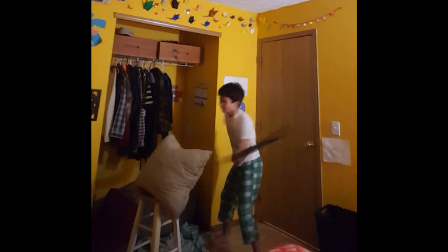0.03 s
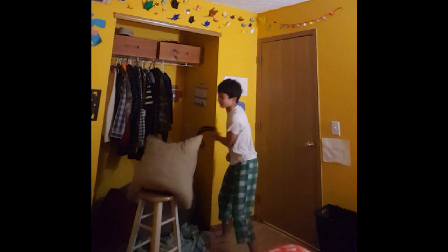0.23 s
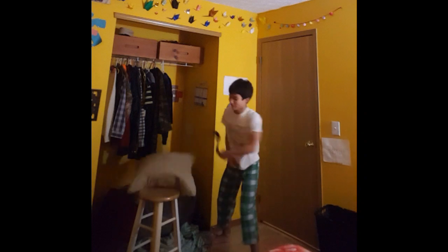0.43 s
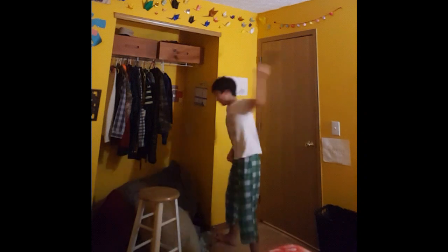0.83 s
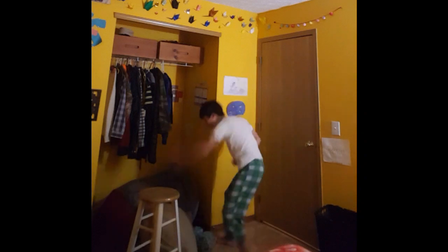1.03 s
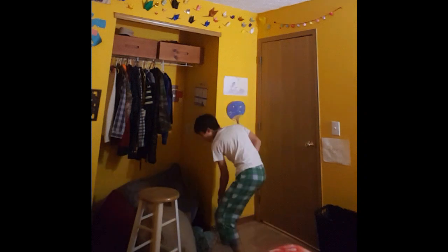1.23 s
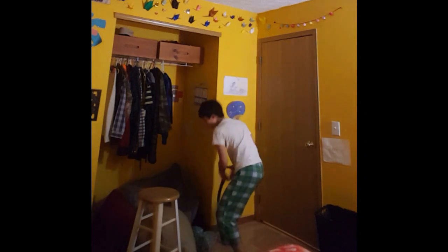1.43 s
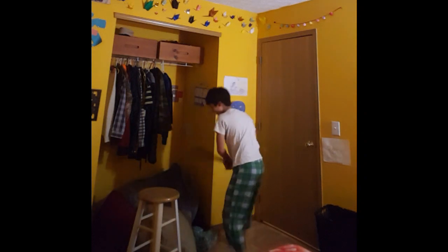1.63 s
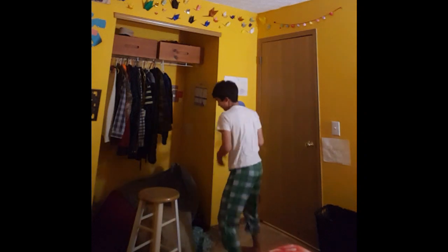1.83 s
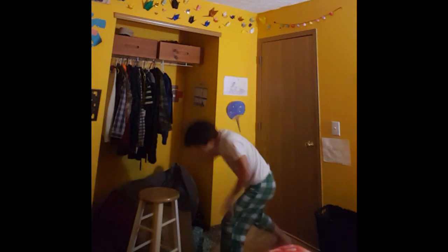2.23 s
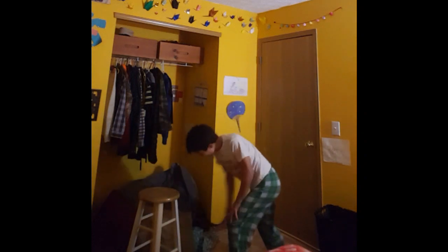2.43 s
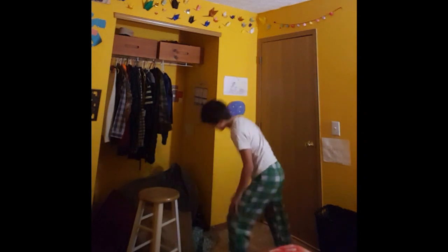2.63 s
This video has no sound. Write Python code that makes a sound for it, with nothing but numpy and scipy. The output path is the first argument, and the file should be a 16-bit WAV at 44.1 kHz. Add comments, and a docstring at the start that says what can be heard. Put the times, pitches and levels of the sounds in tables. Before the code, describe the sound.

A pillow is struck three times with heavy, slapping thumps, about a second apart. Between the blows, clothes rustle and feet thud on floorboards, and a board creaks faintly at the end. Heard close by in a small bedroom.

```python
"""A small bedroom, heard close by on a stereo pair of microphones, the action a little to the left.
A heavy blow, a slap of cloth and a push of air that fills the room and shakes the floor, knocks a
pillow off a stool at 0.2 s. The pillow slides down behind it and is hit on the floor at 1.2 s.
Feet thud on the boards and clothes rustle; the last blow lands at 2.4 s and a board creaks.
A faint mains hum lies under it all."""
import sys
import numpy as np
from scipy.fft import rfft, irfft
from scipy.io import wavfile
from scipy.ndimage import map_coordinates

SR = 44100
rng = np.random.default_rng(int(sys.argv[2]) if len(sys.argv) > 2 else 0)


def log_audio(samples):
    """Write samples as a 16-bit WAV file to the path given in sys.argv[1]."""
    # one column per channel
    frames = np.atleast_2d(samples).T
    # limit to full scale, then quantise
    limited = np.clip(frames, -1, 1)
    pcm = np.round(limited * 32767).astype(np.int16)
    wavfile.write(sys.argv[1], SR, pcm)


N = 123479
T = np.arange(N) / SR
HZ = np.fft.rfftfreq(2 * N, 1 / SR)


def amp(db):
    return 10 ** (np.asarray(db) / 20)


def unit(x):
    return x / np.sqrt(np.mean(x ** 2) + 1e-20)


def along(points, hz):
    """Read (frequency, value) points on a log frequency axis."""
    freqs, values = np.transpose(points)
    return np.interp(np.log(hz + 1), np.log(freqs + 1), values)


def filtered(x, gain):
    """x times a gain for each frequency."""
    return irfft(rfft(x, 2 * N) * gain)[..., :N]


def wobble(rate):
    """A smooth random curve, rate knots a second."""
    return map_coordinates(rng.standard_normal(4096), [T * rate], mode="wrap")


def diffuse(gain):
    """Coloured noise of rms 1 as the room brings it to two microphones."""
    # likeness of left and right (frequency [Hz], correlation [0-1])
    likeness = [(100, .99), (300, 0.97), (600, 0.845), (1100, 0.099), (2500, 0.015), (10000, .02)]
    turn = np.arccos(np.clip(along(likeness, HZ), -1, 1)) / 2
    mid, side = filtered(rng.standard_normal((2, N)), gain * np.array([np.cos(turn), np.sin(turn)]))
    return unit(np.array([mid + side, mid - side]))


def swell(start, rise, hold, t60):
    """Attack, hold and exponential release, all in seconds."""
    t = np.maximum(T - start, 0)
    return (1 - np.exp(-t / rise)) * np.exp(-np.log(1000) * np.maximum(t - hold, 0) / t60)


def pulse(gain):
    """The shortest causal pulse of this colour, peak 1."""
    cepstrum = irfft(np.log(gain + 1e-6))
    cepstrum[1:N] *= 2
    cepstrum[N:] = 0
    wave = irfft(np.exp(rfft(cepstrum)))[:N]
    return wave / abs(wave).max()


def ring(modes, start, rise):
    """Modes ring after a soft push."""
    t = np.maximum(T - start, 0)
    return sum(amp(db) * np.sin(2 * np.pi * hz * t) * swell(start, rise, 0, t60) for hz, db, t60 in modes)


def blows():
    """A slap with its first wall echoes, then the crumpling puff, dying octave by octave in the room."""
    # blows (time [s], level [dB], rise [s], hold [s], slap [dB], slap cutoff [Hz], boom [dB])
    hits = [(0.2227, -13.5, 0.0056, 0.056, 0.5, 1220, -22), (1.2292, -12, 0.00092, 0.043, 1, 2500, -19),
            (2.4341, -13.5, 0.000783, 0.033, -5, 3000, -15.5)]
    # colour of each blow (frequency [Hz], level [dB])
    on_stool = [(20, -22.5), (40, -3.5), (80, -4.5), (110, -12), (145, -7), (185, -14.5), (270, -6),
                (350, -1), (420, -2.5), (520, -0.5), (680, -3), (810, -3.5), (1050, -12), (1450, -21.5),
                (1850, -17.5), (3000, -30.5), (7000, -35), (10000, -32.5), (14500, -39)]
    on_floor = [(20, -28), (45, -21), (80, 0), (112, -18), (145, -5.5), (215, -4.5), (260, -7), (340, -2.5),
                (520, -8.5), (750, -10), (1050, -5), (1400, -15), (1900, -12), (2600, -20.5), (4000, -26.5),
                (6000, -36), (9500, -42.5), (14500, -50.5)]
    last_blow = [(40, -15), (85, -7), (175, -16.5), (225, -7.5), (290, -9.5), (355, -0.5), (430, -2),
                 (510, -11.5), (650, -6), (770, -6.5), (890, -17), (1030, -11.5), (1380, -9), (1700, -16.5),
                 (2300, -20.5), (3900, -27.5), (5000, -34), (14500, -47)]
    # decay of the bedroom (frequency [Hz], t60 [s])
    room_t60 = [(60, .33), (200, 0.26), (500, 0.29), (1500, 0.32), (4000, 0.26), (12000, 0.26)]
    # how long each band holds (frequency [Hz], hold [ratio])
    hold_share = [(100, 0.6), (400, 1.345), (1500, 0.75), (5000, 1.02), (12000, 0.17)]
    # first reflections at the microphones (delay [s], level [dB])
    walls = [(.0075, -16), (.012, -1.5), (0.019, -10)]
    # low boom of floor and room (frequency [Hz], level [dB], t60 [s])
    boom = [(52, -1, 0.24), (84.2, 4.5, 0.23), (136.3, -5, 0.22)]
    direct = (0.001, 0.022)  # the straight path (delay [s], level [dB])
    crumple_db, late_db = 0.8, -34.5
    out = np.zeros((2, N))
    octaves = 60 * 2. ** np.arange(9)
    bands = [np.interp(np.log(HZ + 1), np.log(octaves), row) for row in np.eye(len(octaves))]
    for hit, colour in zip(hits, (on_stool, on_floor, last_blow)):
        start, db, rise, hold, slap_db, slap_hz, boom_db = hit
        gain = amp(along(colour, HZ))
        puff = diffuse(gain) * amp(crumple_db * wobble(rate=300))  # the stuffing collapses unevenly
        spectrum = rfft(unit(puff), 2 * N)
        for hz, band in zip(octaves, bands):
            attack = rise + 1 / (4 * hz)
            early = swell(start, attack, hold * along(hold_share, hz), along(room_t60, hz))
            late = amp(late_db) * swell(start, attack, hold=0, t60=0.53) / (1 + hz / 4000)
            out += amp(db) * (early + late) * irfft(spectrum * band)[:, :N]
        slap = -amp(slap_db) * pulse(gain / (1 + (HZ / slap_hz) ** 2))
        for delay, path_db in [direct] + walls:
            for mic in out:
                arrival = round((start + rise + delay * (1 + rng.normal(0, 0.014))) * SR)
                mic[arrival:] += amp(path_db) * slap[:N - arrival]
        out += amp(boom_db) * ring(boom, start + rise, rise=0.008)
    return out


def snaps():
    """The pillow cover snaps taut as each blow bites."""
    # snaps (time [s], level [dB])
    bites = [(0.2285, -21), (1.2316, -23.5), (2.44, -21.5)]
    # colour of the cover (frequency [Hz], level [dB])
    cover = [(300, -11), (1500, 10.5), (6000, -8.5), (14500, -17)]
    envelope = sum(amp(db) * swell(start, rise=0.0006, hold=0.0037, t60=0.026) for start, db in bites)
    return envelope * diffuse(amp(along(cover, HZ)))


def stool():
    """The stool, jolted by the first blow, gives a short wooden ring."""
    hz, db, t60 = 3805, -22.5, 0.0362
    return ring([(hz, db, t60)], start=0.32, rise=0.00084)


def feet():
    """Soft heels thud on the boards and damp them; a longer contact sounds duller."""
    # footfalls (time [s], level [dB], contact [s], damping [0-1])
    steps = [(.78, -42, 0.003, 0.41), (1.033, -37.5, 0.0024, 0.7), (1.07, -37, 0.0044, 0.14),
             (1.706, -21.5, 0.0041, 0.01), (1.897, -14, 0.0041, 1), (1.926, -20.5, 0.0014, 0.42),
             (2.011, -14, 0.0039, 0.81), (2.125, -28.5, 0.0064, 0.02), (2.211, -39, 0.0053, 0.1)]
    # floor modes (frequency [Hz], level [dB], t60 [s])
    floor = [(55.3, 0.5, 0.27), (87.62, 7, 0.36), (137.15, -1.5, 0.21)]
    damp_s = 0.024
    out = np.zeros(N)
    for start, db, contact, damping in steps:
        thud = ring(floor, start, rise=0.0054) * np.exp(-damping * np.maximum(T - start, 0) / damp_s)
        soft_heel = np.exp(-(np.pi * HZ * contact) ** 2 / 2)
        out += amp(db) * filtered(thud, soft_heel)
    return out


def wood():
    """Light knocks on the boards, and their creak under a foot: noise through wooden resonances."""
    # knocks and creaks (time [s], level [dB])
    knocks = [(1.03, -40.5), (1.819, -41.5), (1.924, -48), (1.978, -47), (2.073, -44.5)]
    creaks = [(1.707, -54.5), (2.713, -46)]
    # their resonances (frequency [Hz], level [dB])
    knock_body = [(420, 4), (630, -1), (830, -9)]
    creak_body = [(1600, 2), (1850, -1), (2150, -10)]
    half_width_hz, knock_t60, creak_t60 = 140, 0.089, 0.17
    out = np.zeros((2, N))
    for events, body, t60 in (knocks, knock_body, knock_t60), (creaks, creak_body, creak_t60):
        colour = sum(amp(db) / (1 + ((HZ - hz) / half_width_hz) ** 2) for hz, db in body)
        envelope = sum(amp(db) * swell(start, rise=0.0018, hold=0.00376, t60=t60) for start, db in events)
        out += envelope * diffuse(colour)
    return out


def cloth():
    """Soft knocks and grainy scuffs of cloth, and the smoother hiss of sliding fabric."""
    # scuffs (time [s], body [dB], rustle [dB], rise [s], t60 [s])
    scuffs = [(0.107, -53.5, -54, 0.0085, 0.73), (0.197, -30, -48, 0.0099, 0.28),
              (.211, -18.5, -32, 0.0078, 0.27), (0.52, -40.5, -45.5, 0.0013, 0.23),
              (.722, -45, -60.5, 0.0045, 0.168), (1.028, -42, -43.5, 0.00085, 0.24),
              (1.178, -45.5, -51, .0015, 0.46), (1.206, -23, -34.5, 0.0022, 0.067),
              (1.457, -62.5, -45.5, 0.0022, 0.27), (1.678, -61, -61.5, 0.002, 0.18),
              (1.708, -54, -55.5, 0.0014, 0.17), (1.813, -51, -46.5, 0.00135, 0.24),
              (1.996, -42, -54, 0.0028, 0.16), (2.161, -48.5, -58.5, 0.00123, 0.67),
              (2.232, -59, -46.5, 0.0062, 0.26), (2.285, -69, -48, 0.0017, 0.33),
              (2.361, -64, -49, 0.00228, 0.43), (2.41, -40.5, -53, 0.0054, 0.216),
              (2.572, -68, -46.5, 0.007, 0.16)]
    # slides (time [s], level [dB], rise [s], hold [s], t60 [s])
    slides = [(0.73, -46.5, 0.014, 0.11, 1.22), (0.998, -61, 0.046, 0.11, 0.38),
              (1.747, -58.5, 0.0085, 0.036, 0.34), (1.811, -48.5, 0.015, 0.042, 0.524),
              (2.026, -52.5, 0.0098, 0.012, .25), (2.65, -57, 0.003, 0.01, 0.12),
              (2.757, -52.5, 0.0099, 0.07, .4)]
    # colours of the fabric (frequency [Hz], level [dB])
    body_eq = [(50, -9.5), (200, -9), (450, -2), (800, -10.5), (2000, -26.5), (5000, -50)]
    rustle_eq = [(200, -17), (800, 2.5), (2000, 7), (4000, -1), (8000, -10), (14500, -12.5)]
    hiss_eq = [(100, 4), (500, 9.5), (1000, 3.5), (2500, 4), (5000, -3.5), (10000, -4.5), (14500, -8.5)]
    body, rustle, hiss = (diffuse(amp(along(eq, HZ))) for eq in (body_eq, rustle_eq, hiss_eq))
    rustle = unit(rustle * amp(2.5 * wobble(rate=300)))
    hiss = unit(hiss * amp(0.8 * wobble(rate=52)))
    scuffing = sum(swell(start, rise, rise, t60) * (amp(body_db) * body + amp(rustle_db) * rustle)
                   for start, body_db, rustle_db, rise, t60 in scuffs)
    sliding = hiss * sum(amp(db) * swell(start, rise, hold, t60) for start, db, rise, hold, t60 in slides)
    return scuffing + sliding


def room_tone():
    """Mains hum, low steady air and the rumble of someone moving about."""
    # mains hum (frequency [Hz], level [dB])
    mains = [(119, -56), (237, -66.5)]
    # colour of air and rumble (frequency [Hz], level [dB])
    air = [(25, -8), (70, 1), (160, -16.5), (340, -13), (700, -20), (2000, -28), (6000, -40.5),
           (14500, -46)]
    # rumble of shifting weight, sinking while the body is still (time [s], level [dB])
    shifting = [(0, -54.5), (.45, -50.5), (.68, -55.5), (.85, -49), (1.15, -47.5), (1.45, -56),
                (1.66, -63.5), (1.8, -50), (2.3, -53.5), (2.78, -46)]
    air_db = -62
    hum = sum(amp(db) * np.sqrt(2) * np.sin(2 * np.pi * (hz * T + rng.random())) for hz, db in mains)
    shifting_db = np.interp(T, *np.transpose(shifting))
    return hum + np.hypot(amp(air_db), amp(shifting_db)) * diffuse(amp(along(air, HZ)))


def standing_waves():
    """Frequency response of the lingering low notes of the bedroom."""
    # room modes (frequency [Hz], level [dB], t60 [s])
    modes = [(219.9, 1, 0.3), (285.6, 1, 0.33), (343.5, -1.5, 0.241)]
    peaks = [(hz, db, np.log(1000) / (np.pi * t60)) for hz, db, t60 in modes]
    return 1 + sum(amp(db) * 1j * HZ * width / (hz ** 2 - HZ ** 2 + 1j * HZ * width)
                   for hz, db, width in peaks)


def scene():
    """Everything happens a little to the left: earlier and brighter at that microphone."""
    # balance of the pair (frequency [Hz], left minus right [dB])
    balance = [(100, 1.1), (500, -1), (1200, -0.6), (2300, 4), (5000, 4), (10000, 8.5), (14000, 8)]
    left_leads_s = 0.00014
    lean = np.array([[0.5], [-0.5]])
    place = amp(lean * along(balance, HZ)) * np.exp(2j * np.pi * HZ * left_leads_s * lean)
    sources = blows() + snaps() + stool() + feet() + wood() + cloth() + room_tone()
    return filtered(sources, place * standing_waves())


def record(dry):
    """The recorder cuts the deepest bass, rounds the peaks and keeps nothing above its band limit."""
    low_cut_hz, ceiling, top_hz = 11, 1.1, 14600
    thinned = filtered(dry, 1j * HZ / (low_cut_hz + 1j * HZ))
    rounded = thinned / (1 + (thinned / ceiling) ** 8) ** (1 / 8)
    return filtered(rounded, 1 / np.sqrt(1 + (HZ / top_hz) ** 240))


dry = scene()
out = record(dry)
log_audio(out)
```